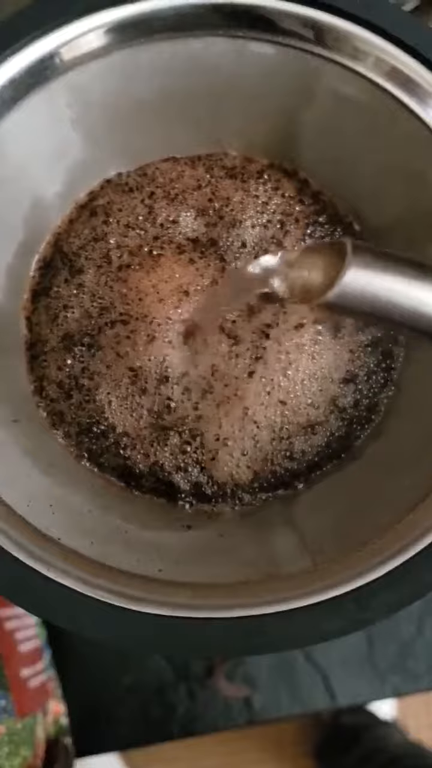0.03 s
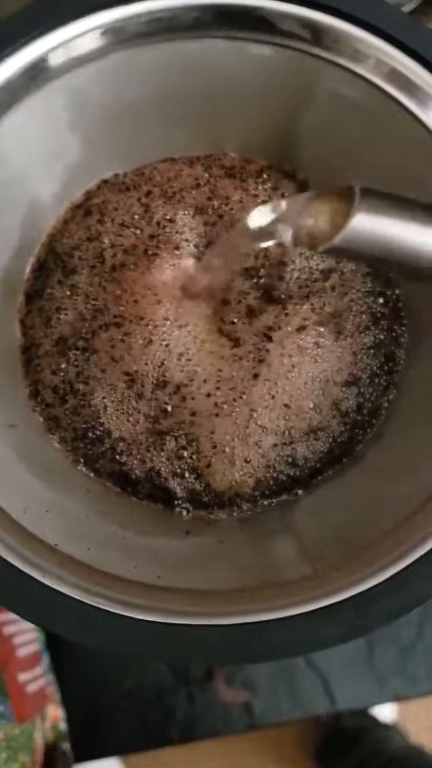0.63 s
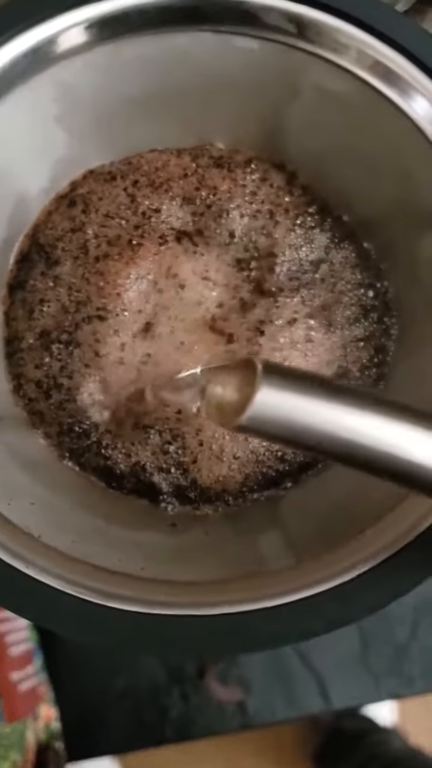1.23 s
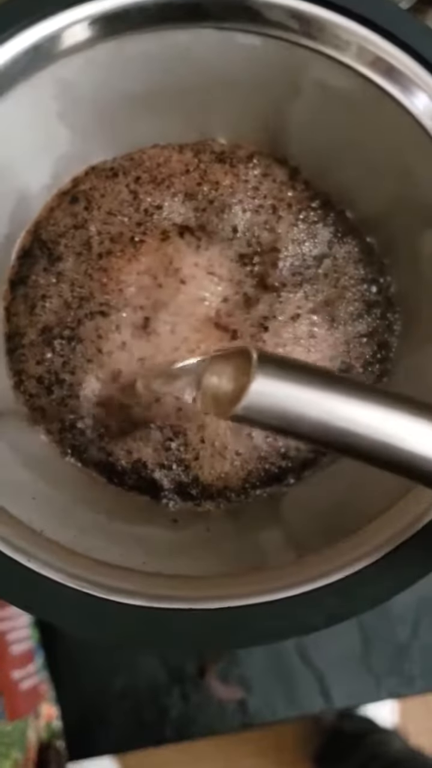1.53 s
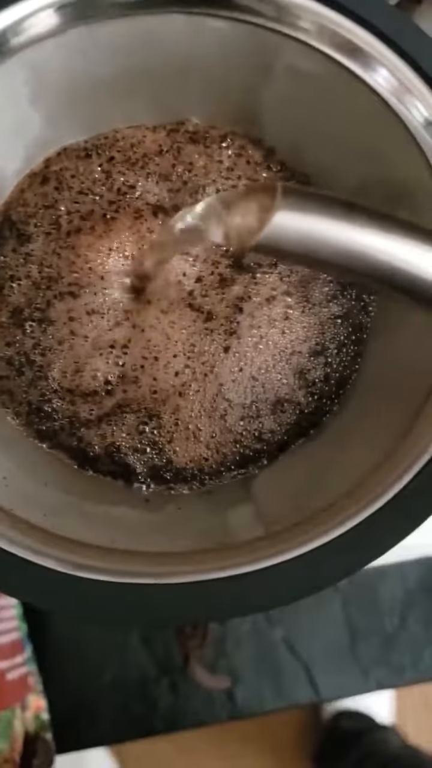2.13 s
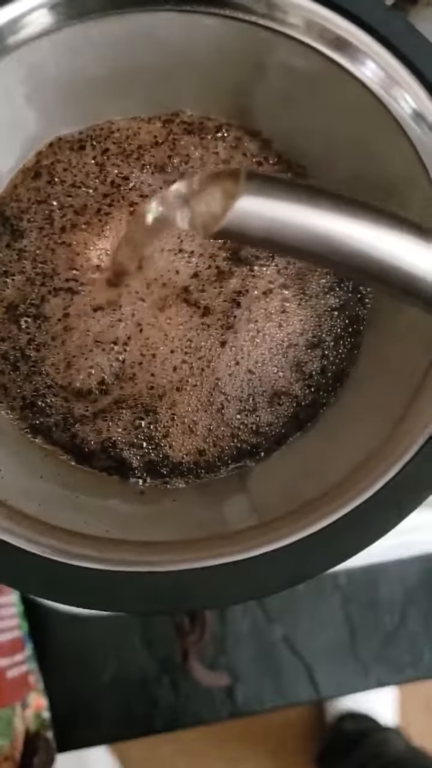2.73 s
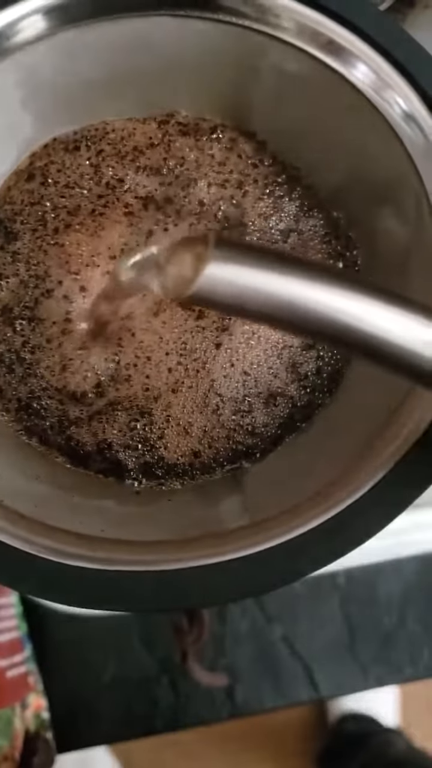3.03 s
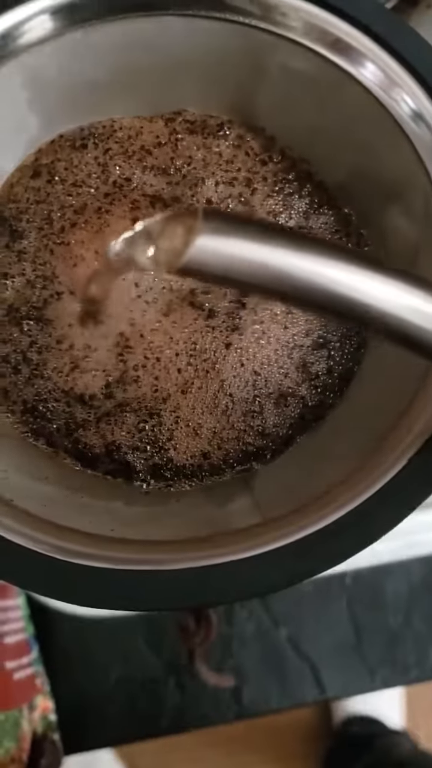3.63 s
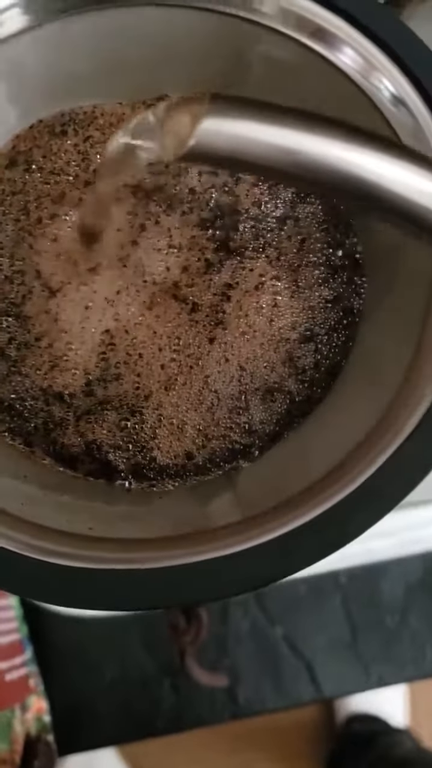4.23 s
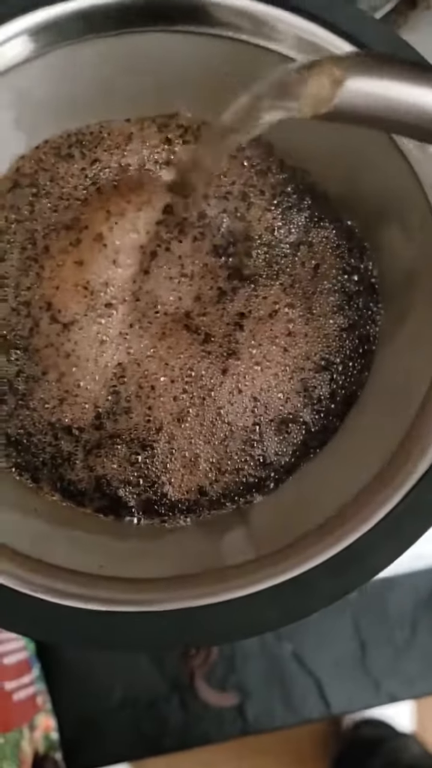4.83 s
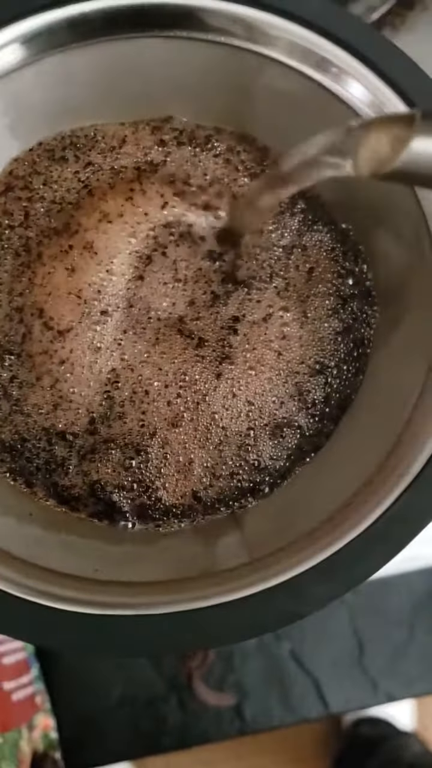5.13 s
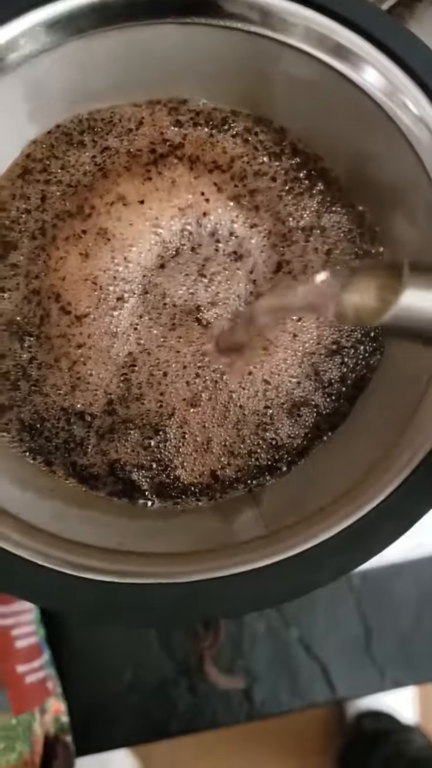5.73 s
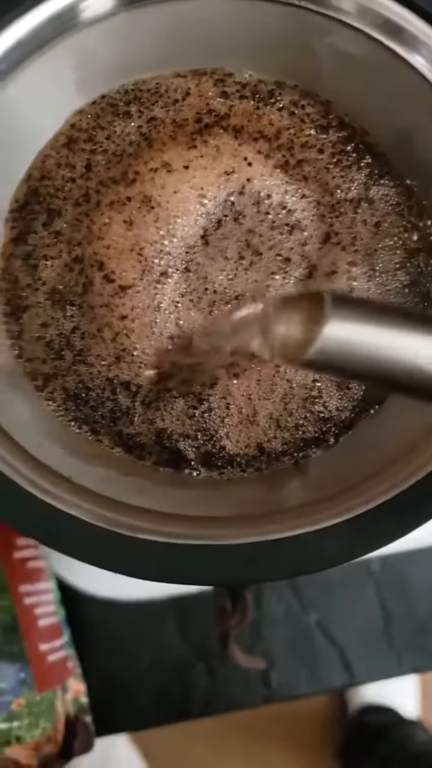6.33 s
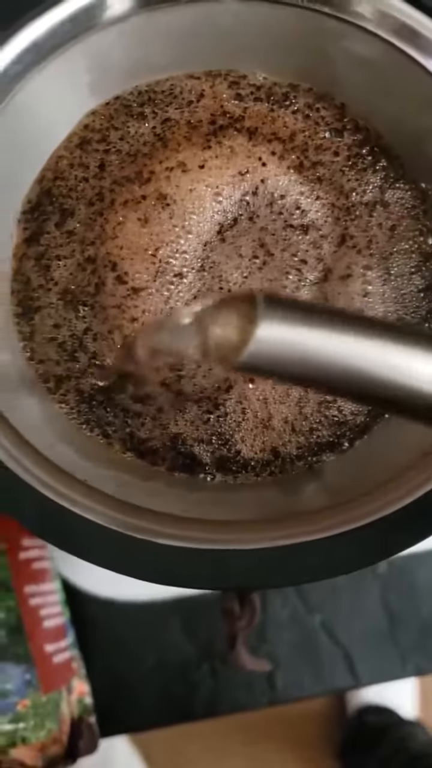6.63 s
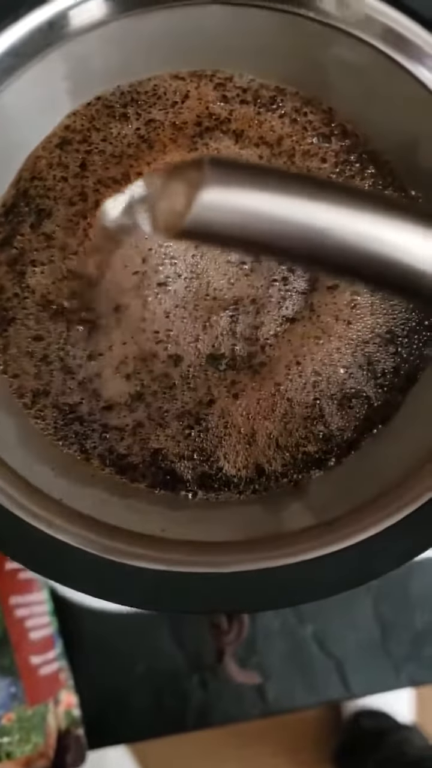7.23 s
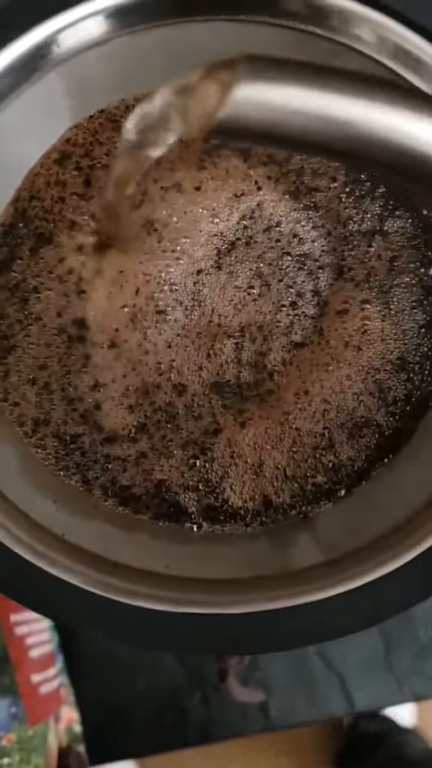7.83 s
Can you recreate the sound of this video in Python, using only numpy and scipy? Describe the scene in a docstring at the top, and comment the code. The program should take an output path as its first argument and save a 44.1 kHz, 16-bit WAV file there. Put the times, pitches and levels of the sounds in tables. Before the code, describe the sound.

A thin stream of hot water trickles onto wet coffee grounds with small plops, wet ticks and crackling foam.

```python
"""Short plops and wet ticks, close by: a thin stream of hot water circles over wet coffee grounds.
Each drop or bursting bubble makes a pocket of air ring (the plop) and throws a fine spray (the tick).
The hollow cone of the steel dripper colours both. In between, small bubbles gurgle and foam crackles,
and once the stream gives a soft swish. The low hum of a quiet room lies underneath."""
import sys
import numpy as np
from scipy import signal
from scipy.fft import rfft, irfft
from scipy.io import wavfile

SR = 44100
rng = np.random.default_rng(int(sys.argv[2]) if len(sys.argv) > 2 else 0)


def inscribe(sig):
    """Save sig as 16-bit PCM at rate SR to the path in sys.argv[1].

    A 1-D sig is mono; a 2-D sig holds one channel per row.
    Samples are clipped to [-1, 1] before scaling.
    """
    pcm = np.round(np.clip(np.atleast_2d(sig).T, -1, 1) * 32767)
    wavfile.write(sys.argv[1], SR, pcm.astype(np.int16))


N = 347949
GRAIN = 2048  # samples in one grain, meaning a single plop or tick

# The clear drops. Each row: start in seconds, plop level in dB, plop pitch in Hz, splash level in dB.
CLEAR_DROPS = [(0.0594, -37.5, 1275, -50), (0.192, -41, 1930, -41), (0.5596, -37.5, 1460, -43.5),
               (0.5735, -49, 1210, -60), (0.7055, -34.5, 1400, -41.5), (0.7529, -37.5, 1800, -51),
               (0.8225, -38, 1040, -45), (0.8408, -49.5, 1210, -47.5), (0.8948, -42.5, 1340, -41.5),
               (0.993, -28, 1900, -37.5), (1.0675, -31, 1645, -36.5), (1.374, -44, 1380, -53),
               (1.4177, -47, 1500, -64), (1.4852, -46, 1400, -53.5), (1.5548, -44, 1950, -45),
               (1.6348, -42, 1210, -65), (1.7817, -37.5, 1870, -48.5), (1.8639, -46, 860.0, -53),
               (2.1775, -44.5, 1680, -65), (2.3107, -46.5, 1680, -49.5), (2.3826, -35.5, 2320, -45),
               (2.4017, -40, 1320.0, -41.5), (2.4501, -37.5, 1270, -44), (2.5058, -45.5, 1910.0, -48),
               (3.0035, -48.0, 1570, -51.5), (3.0151, -46.5, 1470, -53.5), (3.0946, -30.5, 1870, -41.5),
               (3.1964, -47, 1340, -61), (3.2614, -39.5, 1360, -69), (3.431, -35, 2120, -32),
               (3.4435, -45, 1730, -61), (3.4935, -43.5, 1290, -50), (3.5528, -45.5, 1220, -66),
               (3.6248, -49.5, 1110.0, -63), (3.665, -49.5, 900, -74), (3.7838, -50, 1620.0, -52),
               (3.7948, -39.5, 1340, -34.5), (4.3373, -49.5, 1930.0, -46), (4.357, -41.5, 1730, -45),
               (4.4827, -44, 894, -57), (4.585, -49.5, 1040, -46.5), (4.6377, -36.5, 1040, -44.5),
               (4.79, -32, 1680, -40), (4.8881, -31.5, 1760, -40), (4.9724, -50, 1410.0, -42.5),
               (5.032, -44.5, 770, -43), (5.0639, -45, 820, -47), (5.0782, -52, 770.0, -50),
               (5.1076, -50.5, 850, -45), (5.227, -54, 750, -46.5), (5.2553, -49, 770, -52.0),
               (5.3232, -45, 2120.0, -41.5), (5.351, -53, 2140, -40.5), (5.3706, -43, 2300, -37.0),
               (5.4868, -44.5, 965, -49), (5.5135, -55, 1230, -52), (5.574, -50, 1480, -56),
               (5.7733, -42, 1760, -49.5), (5.8003, -47.5, 1250, -48), (6.015, -43, 1790, -39),
               (6.0762, -38, 1880, -44.5), (6.1063, -49.5, 1280, -42), (6.1687, -45, 2200, -39),
               (6.2089, -45.5, 1280, -52), (6.231, -47.5, 2180.0, -55), (6.2941, -43.5, 1080, -52.0),
               (6.3382, -51, 1080.0, -42), (6.3618, -48, 1230.0, -46), (6.374, -48, 970, -57),
               (6.7791, -46.0, 2230, -39), (6.8147, -42, 1220, -44.5), (7.1374, -50.5, 735, -55),
               (7.242, -51, 740, -66), (7.3923, -46.5, 1010.0, -46), (7.4603, -49, 1400, -44.5),
               (7.4695, -45.5, 1000, -52), (7.489, -51.5, 990, -54), (7.5772, -45.5, 745, -65),
               (7.6363, -48.5, 1360.0, -41.5), (7.7089, -40.5, 1000, -40), (7.8033, -53.5, 980, -55),
               (7.873, -49.5, 2220, -45.5)]
# Large foam blisters that snap. Each row: start in seconds, level in dB, pitch in Hz.
FOAM_BLISTERS = [(0.092, -37.5, 10980.0), (0.268, -41.0, 7500), (0.7532, -37, 10200),
                 (1.5718, -43.5, 10100), (1.6098, -42, 4830), (1.6835, -37, 3550), (1.7226, -45.5, 6850),
                 (1.8342, -43, 7800), (1.9445, -42.5, 10300), (2.0861, -41, 4700), (2.3383, -35, 4660),
                 (2.6519, -39, 6400), (3.2599, -37.5, 8900), (3.3739, -36.5, 4460), (3.3832, -38, 4230),
                 (3.4128, -38.5, 10900), (3.4586, -38.5, 3880), (3.4949, -35, 10000), (3.5122, -43.5, 4600),
                 (3.5324, -32.5, 4900), (3.5515, -41, 12180.0), (3.7452, -45, 3640), (3.8456, -37, 6560),
                 (3.9535, -42.5, 3520), (4.261, -44, 7200), (4.5365, -40.5, 11890.0),
                 (4.6822, -43.5, 10930.0), (4.7179, -33.0, 5300), (4.7544, -35, 11160.0),
                 (4.9884, -41, 4610.0), (5.487, -36.5, 3960.0), (5.7241, -43.5, 3740),
                 (5.8687, -36.5, 12000), (5.8871, -37.5, 4970), (5.9479, -43, 5000), (6.042, -46.5, 5160),
                 (6.1687, -36, 3660), (6.1953, -43.5, 6240.0), (6.566, -42, 11500), (6.6274, -44, 3680),
                 (6.6814, -42.0, 5530), (6.805, -44.0, 9440.0), (7.3258, -45.5, 3670.0),
                 (7.439, -41.5, 3960), (7.5259, -40.5, 5100), (7.554, -31.5, 9800)]
# How deep the stream digs into the grounds. Each row: time in seconds, relative gurgle level in dB.
DIGGING_CURVE = [(0, -83.5), (0.85, -74.5), (1.72, -71), (1.82, -57), (2.0, -81.5), (2.55, -65),
                 (2.85, -78), (3.55, -65.5), (3.95, -72.5), (4.62, -65.5), (4.95, -76.5), (5.08, -56),
                 (5.3, -64), (5.85, -70.5), (6.25, -61), (6.55, -69.5), (7.25, -67.5), (7.45, -60),
                 (7.89, -58)]
# How much foam the stream stirs up. Each row: time in seconds, relative crackle level in dB.
FROTH_CURVE = [(0, -78), (1.0, -61), (1.45, -76), (2.45, -61), (2.9, -76), (4.7, -58), (7.1, -70.5),
               (7.89, -60)]
# The pitches at which the cone rings. Each row: pitch in Hz, width in Hz, relative strength in dB.
CONE_RESONANCES = [(712, 184, -9.5), (933, 190, -7), (1405, 120, 0), (1665, 240, -4.5), (2138, 202, 9),
                   (2593, 200, -5.5), (3100, 30, -2), (3640, 155, 12.5), (4035, 69, -5), (4875, 79, 11),
                   (5780, 820, -5), (6370, 285, 1.5), (7315, 395, 2), (8820, 120, -5.5), (10070, 247, 5.5),
                   (11250, 350, 4.5), (12180, 960, 9)]
# The pitches that the cone swallows. Each row: pitch in Hz, width in Hz.
CONE_NOTCHES = [(4420, 170), (5480, 75)]
# Early echoes in the cone, stronger for short waves.
# Each row: frequency in Hz, level in dB against the direct sound.
CONE_ECHOES = [(1500, -3.5), (4000, 1)]
# The right side faces away from the dripper, so it sounds duller.
# Each row: frequency in Hz, level in dB against the left side.
RIGHT_SHADOW = [(600, 0), (2100, -3), (2600, -8), (3600, -18), (12500, -15.5)]
# The colour of the room's rumble. Each row: frequency in Hz, relative level in dB.
RUMBLE_COLOUR = [(36, -16), (52, 4), (75, 4), (105, 3), (135, -8.5), (200, -5), (270, -3.5), (340, -5.5),
                 (400, -1), (480, -10), (900, -24.5), (2000, -32), (3000, -42.5), (12000, -37)]
# The steady hum. Each row: pitch in Hz, level in dB before the hum's gain is added.
HUM_TONES = [(59.2, -63.5), (296.1, -69)]


def drops(splash_hz=2900, splash_delay_s=.0005):
    """The stream breaks into drops: each gives a short round plop and a broad splash."""
    s, plop_db, hz, splash_db = np.transpose(CLEAR_DROPS)
    low = plops(s, plop_db, hz, q=4.2, skirt_q=1.5)
    splash_pitch = np.full(len(s), splash_hz)
    return low + ticks(s + splash_delay_s, splash_db, splash_pitch, q=0.7, spray_s=0.0017, low_hz=1700)


def blisters(plop_gain_db=-11.0, pocket_hz=1700, sputter_gain_db=-21.0):
    """A foam blister snaps brightly and tears its neighbours; the hollow it leaves plops faintly."""
    s, db, hz = np.transpose(FOAM_BLISTERS)
    hollow = plops(s, db + plop_gain_db, np.full(len(s), pocket_hz), q=0.57, skirt_q=0.23)
    later_s, later_db = spatter(s, db + sputter_gain_db, mean_delay_s=0.012, fade_db_per_s=93, count=3)
    sputter = ticks(later_s, later_db, rng.uniform(3000, 10700, len(later_s)), q=4.9, spray_s=0.00062)
    snaps = ticks(s, db, hz, q=3.3, spray_s=0.00048)
    return hollow + sputter + snaps


def gurgle(slap_gain_db=-2.0):
    """The stream churns the grounds: large soft bubbles that slap as they close, and many small ones."""
    large = activity_curve(DIGGING_CURVE, mean_db=-62.0, swing=1.0)
    s, db, hz = swarm(large, 682, 1050, spread_db=6.5, count=290)
    deep = plops(s, db, hz, q=3.6, skirt_q=1.6)
    slaps = ticks(s, db + slap_gain_db, 2.5 * hz, q=1.0, spray_s=.002, low_hz=1300)
    small = activity_curve(DIGGING_CURVE, mean_db=-71.0, swing=1.6)
    s, db, hz = swarm(small, 1300, 4000, spread_db=12, count=850)
    return deep + slaps + plops(s, db, hz, q=2.6, skirt_q=1.6)


def swish(at_s=1.83, spread_s=.025, splash_db=-55.0, hz=2400, count=24):
    """The stream skids across the foam once, and many tiny splashes merge into a soft swish."""
    s = at_s + spread_s * rng.standard_normal(count)
    return ticks(s, np.full(count, splash_db), np.full(count, hz), q=2, spray_s=.003, low_hz=1500)


def bubbles(plop_gain_db=10.5, tick_gain_db=7.5):
    """Smaller bubbles plop and splash between the clear drops."""
    activity = activity_curve(DIGGING_CURVE, mean_db=-66.0, swing=.9)
    s, db, hz = swarm(activity, 1100, 2400, spread_db=18.0, count=290)
    db = np.minimum(db, -62)  # their air pockets grow only so large
    low = plops(s, db + plop_gain_db, hz, q=5.5, skirt_q=.9)
    return low + ticks(s, db + tick_gain_db, 2.9 * hz, q=2.2, spray_s=0.0009)


def foam(burst_gain_db=4.5, fizz_gain_db=-5.5):
    """Foam cells burst one by one over a fine, dense fizz."""
    froth = activity_curve(FROTH_CURVE, mean_db=-56.5, swing=0.44)
    s, db, hz = swarm(froth, 4000, 12000, spread_db=19.0, count=230)
    bursts = ticks(s, db + burst_gain_db, hz, q=1.0, spray_s=0.00072)
    s, db, hz = swarm(froth, 4500, 14000, spread_db=11.0, count=800)
    return bursts + ticks(s, db + fizz_gain_db, hz, q=1.6, spray_s=0.002)


def plops(times, level_db, hz, q, skirt_q, rise_per_cycle=0.007):
    """A pocket of air rings briefly as its pitch climbs. A higher q makes it ring longer."""
    hz = hz[:, None]
    cycles = hz * np.arange(GRAIN) / SR
    phase = cycles * (1 + rise_per_cycle * (cycles - q / np.pi) / 2)
    ring = np.cos(2 * np.pi * phase) * np.exp(-np.pi * cycles / q)
    soft_start = resonance(hz, hz / skirt_q)
    return in_cone(times, level_db, rfft(ring) * soft_start)


def ticks(times, level_db, hz, q, spray_s, low_hz=2800, size=600):
    """A film of water snaps and throws a brief spray, brighter when the bubble is small."""
    hz, t = hz[:, None], np.arange(size) / SR
    droplets = rng.standard_normal((len(hz), size)) ** 3 / np.sqrt(15)  # cubing makes noise spiky
    snap = t == 0
    spray = droplets * np.exp(-t / spray_s) + snap
    spray = signal.sosfilt(signal.butter(2, low_hz, "high", fs=SR, output="sos"), spray)
    spectra = rfft(spray, GRAIN) * resonance(hz, hz / q) * resonance(hz, 2.4 * hz)
    return in_cone(times, level_db, spectra)


def swarm(activity, low_hz, high_hz, spread_db, count, lull_db=10.0, lull_s=0.016):
    """Times, levels and pitches of random bubbles whose loudness follows an activity curve."""
    when, size, pitch = rng.random((count, 3)).T
    times = (np.arange(count) + 2 * when - 1 / 2) / count * N / SR
    # The small bubbles are turned down briefly before each blister and drop, so these stand out.
    wait = np.array([row[0] for row in CLEAR_DROPS + FOAM_BLISTERS]) - times[:, None]
    until_next = np.where(wait > 0, wait, 1).min(axis=1)
    lull = np.exp(-(until_next / lull_s) ** 2)
    level_db = np.interp(times, *np.transpose(activity)) + spread_db * (size ** 2 - 1 / 2)
    return times, level_db - lull_db * lull, low_hz * (high_hz / low_hz) ** pitch


def activity_curve(curve, mean_db, swing):
    """Centre a level curve on mean_db and multiply its ups and downs by swing."""
    s, db = np.transpose(curve)
    return np.column_stack([s, mean_db + swing * (db - db.mean())])


def spatter(times, level_db, mean_delay_s, fade_db_per_s, count, spread_db=6.0):
    """Times and levels of the small splashes that each snap sets off, weaker the later they come."""
    wait = mean_delay_s * rng.exponential(1, (len(times), count))
    db = level_db[:, None] - fade_db_per_s * wait + spread_db * rng.standard_normal(wait.shape)
    return (times[:, None] + wait).ravel(), db.ravel()


def in_cone(times, level_db, spectra, spot_db=6.5, fill_rise=0.025, slosh=.009):
    """Each grain starts at its own spot in the cone, so it gets its own mix of ringing and echoes."""
    bins = np.arange(GRAIN // 2 + 1)
    modes = np.array([from_db(db) * resonance(hz, width) for hz, width, db in CONE_RESONANCES])
    cone = from_db(spot_db * rng.standard_normal((len(times), len(modes)))) @ modes
    cone *= np.prod([1 - resonance(hz, width) for hz, width in CONE_NOTCHES], axis=0)
    # Rising water shortens the air space and lifts the pitches; sloshing detunes them a little.
    stretch = 1 + fill_rise * (times[:, None] * SR / N - 1 / 2)
    stretch += slosh * rng.standard_normal((len(times), 1))
    shifted_bins = np.clip(np.rint(bins / stretch), 0, GRAIN // 2).astype(int)
    cone = np.take_along_axis(cone, shifted_bins, axis=1)
    echo_db = np.interp(bins * SR / GRAIN, *np.transpose(CONE_ECHOES))
    early = echoes(len(times), fade_s=0.032, delay_s=0.00064, size=700)
    paths = 1 + from_db(echo_db) * rfft(early, GRAIN)
    grains = irfft((spectra * cone)[:, None] * paths)
    # Give every grain the same energy on both sides before its level is set.
    grains /= np.sqrt(np.sum(grains ** 2, axis=2, keepdims=True) / (SR / 100))
    return placed(times, level_db, grains)


def resonance(hz, width_hz):
    """How strongly something that rings at hz answers each frequency of a grain; 1 at the peak."""
    f = np.arange(GRAIN // 2 + 1) * SR / GRAIN
    return 1j * f * width_hz / (hz ** 2 - f ** 2 + 1j * f * width_hz)


def placed(times, level_db, grains):
    """Lay each stereo grain at its time and level."""
    out = np.zeros((2, N + GRAIN))
    starts = np.clip(times * SR, 0, N).astype(int)
    for at, gain, grain in zip(starts, from_db(level_db), grains):
        out[:, at:at + GRAIN] += gain * grain
    return out[:, :N]


def echoes(count, fade_s, delay_s, size):
    """Stereo pairs of dense echoes that set in after a delay and fall by 60 dB in fade_s."""
    t = np.arange(size) / SR
    shape = from_db(-60 * t / fade_s) * np.clip(t / delay_s - 1, 0, 1)
    return rng.standard_normal((count, 2, size)) * shape / np.linalg.norm(shape)


def room_tone(rumble_db=-56.5, hum_gain_db=1, side_db=-17.0):
    """The room's low rumble and hum, nearly alike on both sides and a little louder on the left."""
    mid, side = coloured(rng.standard_normal((2, N)), RUMBLE_COLOUR)
    rumble = rms_one(mid) + from_db(side_db) * rms_one(side) * np.array([[1], [-1]])
    t = np.arange(N) / SR
    hum = sum(from_db(db) * np.sqrt(2) * np.sin(2 * np.pi * (hz * t + rng.random()))
              for hz, db in HUM_TONES)
    return (from_db(rumble_db) * rumble + from_db(hum_gain_db) * hum) * from_db([[.9], [-.9]])


def coloured(x, points):
    """Turn the frequencies of x up or down along a curve of (Hz, dB) points."""
    hz, db = np.transpose(points)
    grid = np.maximum(np.arange(N // 2 + 1) * SR / N, 1)
    return irfft(rfft(x) * from_db(np.interp(np.log(grid), np.log(hz), db)), N)


def from_db(db):
    """Turn decibels into a gain to multiply by."""
    return 10 ** (np.asarray(db) / 20)


def rms_one(x):
    """Scale x so that its average strength (rms) is 1."""
    return x / np.sqrt(np.mean(x ** 2) + 1e-20)


def scene(wall_echo_db=-16.5, right_lag_s=.00014):
    """The water and its echo from the walls, later and duller on the right, over the room's hum."""
    water = drops() + blisters() + gurgle() + swish() + bubbles() + foam()
    walls = echoes(1, fade_s=0.18, delay_s=0.0052, size=SR // 2)[0]
    left, right = water + from_db(wall_echo_db) * signal.fftconvolve(water, walls, axes=1)[:, :N]
    n = np.arange(N)
    late_right = np.interp(n - right_lag_s * SR, n, right)
    return np.array([left, coloured(late_right, RIGHT_SHADOW)]) + room_tone()


def record(dry, cutoff_hz=12980):
    """Cut away the highest treble steeply."""
    return signal.sosfilt(signal.cheby1(12, .3, cutoff_hz, fs=SR, output="sos"), dry)


dry = scene()
out = record(dry)
inscribe(out)
```